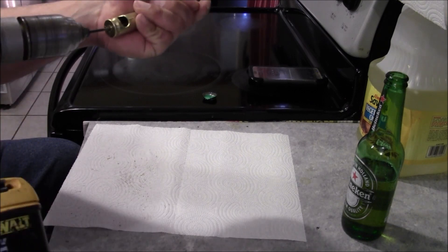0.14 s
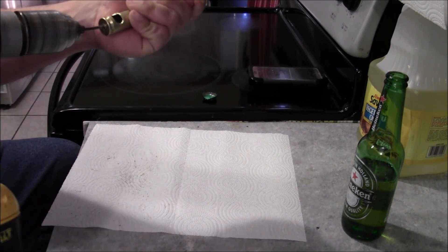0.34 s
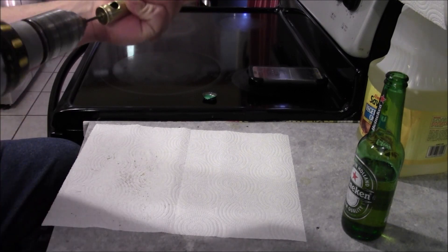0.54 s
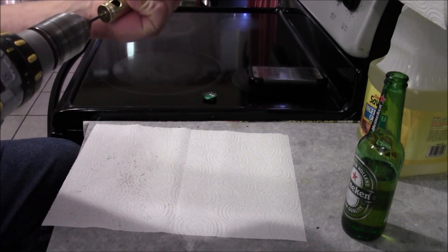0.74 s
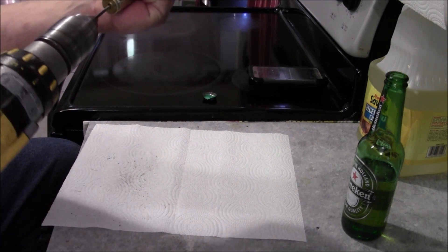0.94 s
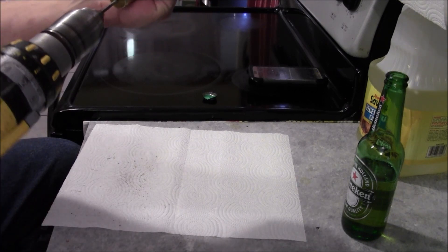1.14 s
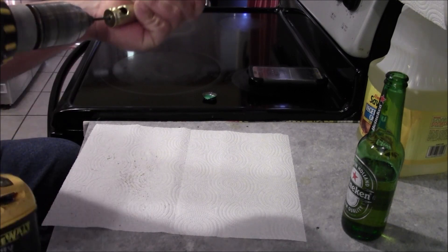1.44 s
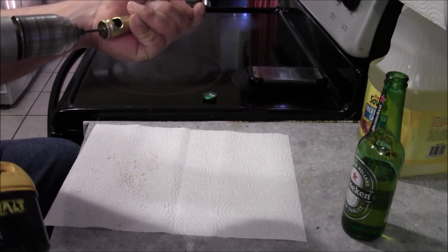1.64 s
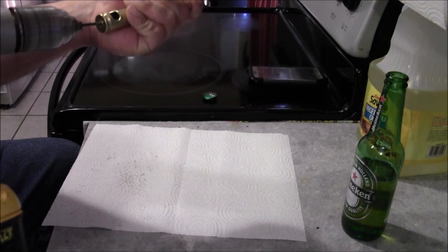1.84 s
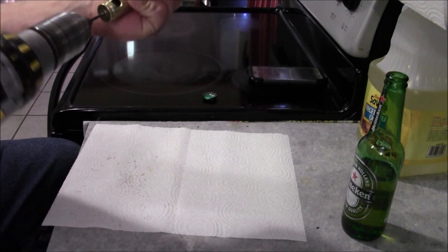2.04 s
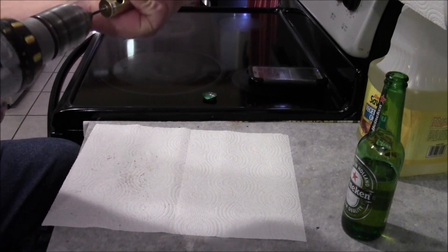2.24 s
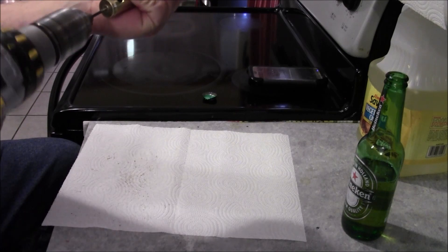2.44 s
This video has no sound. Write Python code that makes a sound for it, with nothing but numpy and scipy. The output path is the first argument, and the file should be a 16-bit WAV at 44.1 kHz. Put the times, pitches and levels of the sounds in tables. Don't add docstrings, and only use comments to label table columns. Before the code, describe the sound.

A cordless drill bores hard metal close by, already running with a buzzing gear whine and gritty rattle. Its pitch sags to about 0.44 s, where the bit squeals briefly, then rises with hissing fan air and holds high until 1.5 s. It bogs down again, squealing roughly around 1.87-1.98 s, then revs to its highest, looser whine by the end. Short tiled-kitchen reverberation, faint low hum.

```python
import sys
import numpy as np
from scipy import signal
from scipy.fft import rfft, irfft
from scipy.io import wavfile
from scipy.ndimage import uniform_filter1d

SR = 44100
rng = np.random.default_rng(int(sys.argv[2]) if len(sys.argv) > 2 else 0)


def store_pcm(level_fs):
    pcm = np.round(np.clip(level_fs, -1, 1) * 32767).astype(np.int16)
    wavfile.write(sys.argv[1], SR, np.atleast_2d(pcm).T)


def attenuation_scalar(level_db):
    decades = np.asarray(level_db, float) / 20
    return 10 ** decades


N = 114660

# time in seconds, shaft speed in Hz.
SHAFT_SPEED = [(0, 158.4), (.112, 157.8), (.28, 132.3), (.393, 107.3), (.438, 103.8), (.56, 197.4),
               (.643, 227.4), (.858, 245.2), (1.078, 257.2), (1.445, 262.9), (1.52, 258.4), (1.77, 184.7),
               (1.915, 155.6), (2.021, 205), (2.119, 237.5), (2.18, 281.4), (2.25, 296.1), (2.6, 309.3)]
# time in seconds, rattle level in dB, fan level in dB.
EFFORT_LEVELS = [(0, -19, -23), (.12, -16, -37), (.43, -16, -43), (.55, -16, -19.5), (.7, -16, -21),
                 (1.1, -16, -21.5), (1.5, -17.5, -17.5), (1.62, -17.5, -29.5), (1.92, -18, -28),
                 (2.05, -15.5, -19.5), (2.3, -17, -21), (2.6, -18.5, -20.5)]
# time in seconds, pole, gear and second stage levels in dB, gear slack (0 = tight).
DRIVE_LOAD = [(0, -7, -13, -4, .1), (.15, -3, -3, -8, 0), (.25, -11, 1, -10, 0), (.41, -13, -7, -14, 0),
              (.46, 4, -12, -8, 0), (.56, 2, -10, -4, 0), (.65, -3, 1, -2, 0), (.84, -15, 1, -7, 0),
              (.96, -2, 1, -6, 0), (1.1, 0, 3, -5, .2), (1.33, -4, -5, -4, .1), (1.45, -12, -18, -3, 0),
              (1.62, -15, -6, 3, 0), (1.78, 1, -13, 3, 0), (1.9, -5, -18, -6, 0), (2, 4, -9, -3, 0),
              (2.15, -5, 0, -6, .5), (2.6, -2, -9, 4, 1.2)]
# multiple of shaft speed, level in dB, wobble in dB, phase wander in rad.
POLE_TONES = [(5, -24, .8, .3)]
# multiple, level in dB, wobble in dB, wander in rad.
GEAR_TONES = [(11.25, -19, 1.5, .5), (12.25, -34, 3, 1), (22.5, -32, 2, 1.2)]
# multiple, level in dB, wobble in dB, wander in rad.
SECOND_STAGE_TONES = [(3.125, -30, 1, .3)]
# multiple, level in dB, wobble in dB, wander in rad.
CAGE_TONES = [(3, -28, 1, .3)]
# multiple, level in dB, wobble in dB, wander in rad.
OVERTONE_TONES = [(15, -28, 2, .7), (23.5, -33, 3, 1.5), (25, -37, 3, 1), (27, -38, 3, 1.2),
                  (30, -35, 3, .8), (33.75, -34, 2, 2), (45, -39, 3, 1.5)]
# centre in Hz, width in Hz, level in dB.
HOUSING_RESONANCES = [(920, 200, 6), (1295, 100, 1), (2800, 600, 0), (3750, 700, 0), (5200, 600, 2),
                      (8000, 900, 4)]
# centre in Hz, width in Hz, level in dB.
RINGING_PARTS = [(893, 110, -13), (1011.5, 65, -13.5), (1450, 110, -33.5), (1602, 80, -26),
                 (2385, 94, -26.5), (2815, 590, -21.5), (3640, 160, -20), (3947, 68, -17), (4196, 46, -20),
                 (4580, 130, -17.5), (4980, 220, -19), (5230, 270, -18.5), (7820, 110, -24),
                 (8660, 120, -27)]
# frequency in Hz, density in dB per Hz.
RATTLE_SPECTRUM = [(150, -55), (250, -16.5), (586, -21), (988, -6.5), (1310, -5), (1550, -4), (2130, -0.5),
                   (3980, 0.5), (16000, -17.5)]
# frequency in Hz, density in dB per Hz.
FAN_SPECTRUM = [(3000, -34.5), (5500, 2.5), (7000, 2), (9000, -0.5), (11000, -4), (13000, -18.5),
                (16000, -33)]
# time in seconds, pitch in Hz, level in dB.
SQUEAL_PATHS = [
    [(.44, 3100, -28), (.451, 3720, -10), (.457, 4500, -19), (.467, 4445, -11), (.479, 4700, -26),
     (.49, 4600, -17), (.497, 3100, -14), (.501, 3720, -10), (.511, 3800, -24)],
    [(1.866, 3880, -24), (1.873, 4044, -13), (1.881, 4450, -17), (1.888, 4200, -15), (1.898, 4500, -21)],
    [(1.902, 4300, -22), (1.908, 4100, -13), (1.915, 4350, -14), (1.925, 3740, -14), (1.935, 3800, -11),
     (1.942, 4400, -13), (1.958, 4030, -13), (1.968, 4420, -14), (1.98, 4300, -28)],
]
# frequency in Hz, density in dB per Hz.
HUM_SPECTRUM = [(22, -22), (40, -31), (52, -1), (65, -8.5), (80, -12.5), (150, -3), (300, -11), (480, 11)]
# frequency in Hz, side level in dB.
SIDE_SPECTRUM = [(60, -12), (300, -18), (1700, -26), (4500, -14.5), (8000, -10), (10000, -15.5),
                 (12000, -7), (15000, -2.5)]


def white():
    return rng.standard_normal(N)


def unit(x):
    return x / np.sqrt(np.mean(x ** 2))


def walk(rate):
    hold = int(SR / rate)
    levels = np.repeat(rng.standard_normal(N // hold + 1), hold)
    return unit(uniform_filter1d(uniform_filter1d(levels, hold), hold)[:N])


def curve(table, t):
    rows = np.array(table, float).T
    return [np.interp(t, rows[0], column) for column in rows[1:]]


def slope(table, hz):
    rows = np.array(table, float).T
    return attenuation_scalar(np.interp(np.log(hz + 1), np.log(rows[0]), rows[1]))


def peaks(table, hz):
    return np.sqrt(sum(attenuation_scalar(2 * db) / (1 + (2 * (hz - f) / w) ** 2) for f, w, db in table))


def shaped(x, gain):
    return irfft(rfft(x) * gain(np.arange(N // 2 + 1) * SR / N), N)


def patchy(x, table, flicker_db, rate):
    out = 0
    for octave in 8 + np.arange(19) / 3:
        def band(hz):
            distance = np.clip(3 * (np.log2(hz + 1) - octave), -1, 1)
            return slope(table, hz) * np.cos(np.pi / 2 * distance) ** 2
        out = out + shaped(x, band) * attenuation_scalar(flicker_db * walk(rate))
    return unit(out)


def whine(table, shaft, slack=0):
    flat_db, slack_wander = -8, 2.4
    turns = np.cumsum(shaft) / SR
    coarse = np.arange(N)[::64]
    out = 0
    for multiple, db, wobble_db, wander in table:
        housing = np.hypot(peaks(HOUSING_RESONANCES, multiple * shaft[coarse]), attenuation_scalar(flat_db))
        gain = np.interp(np.arange(N), coarse, housing) * attenuation_scalar(db + wobble_db * walk(14.27))
        drift = wander * (walk(60) + slack_wander * slack * walk(200))
        phase = 2 * np.pi * multiple * turns + drift + 6 * rng.random()
        out = out + np.sqrt(2) * gain * np.sin(phase)
    return out


def drive_tones(shaft, t):
    slack_db = 14
    pole_db, gear_db, second_db, slack = curve(DRIVE_LOAD, t)
    tones = attenuation_scalar(pole_db) * whine(POLE_TONES, shaft)
    tones = tones + attenuation_scalar(gear_db) * whine(GEAR_TONES, shaft, slack)
    tones = tones + attenuation_scalar(second_db) * whine(SECOND_STAGE_TONES, shaft)
    tones = tones + attenuation_scalar(slack_db * (slack - 1)) * whine(CAGE_TONES, shaft)
    return tones + whine(OVERTONE_TONES, shaft, slack)


def unbalance(shaft):
    level_db, db_per_octave, reference_hz = -44.5, 11, 260
    shake_db = level_db + db_per_octave * np.log2(shaft / reference_hz) + walk(8.9)
    return np.sqrt(2) * attenuation_scalar(shake_db) * np.sin(2 * np.pi * np.cumsum(shaft) / SR)


def rattle(shaft):
    turns = np.cumsum(shaft) / SR
    shaft_db = 1.3 * np.sin(2 * np.pi * turns)
    chuck_db = 0.55 * np.sin(2 * np.pi * turns / 6)
    knocks = white() * attenuation_scalar(shaft_db + chuck_db + 1.23 * walk(300))
    out = patchy(knocks, RATTLE_SPECTRUM, 1.7, 11.54)
    for f, w, db in RINGING_PARTS:
        ring = unit(shaped(knocks, lambda hz: peaks([(f, w, 0)], hz) ** 2))
        out = out + attenuation_scalar(db + 2.0 * walk(9.95)) * ring
    return out


def squeal(t):
    rough_db, jitter = 2.5, .012
    out = 0
    for path in SQUEAL_PATHS:
        hz, db = curve(path, t)
        on = uniform_filter1d(1. * ((t > path[0][0]) & (t < path[-1][0])), size=64)
        phase = 2 * np.pi * np.cumsum(hz * (1 + jitter * walk(500))) / SR
        out = out + np.sqrt(2) * on * attenuation_scalar(db + rough_db * walk(600)) * np.sin(phase)
    return out


def fan_hiss():
    return patchy(white(), FAN_SPECTRUM, 2.2, 11)


def room(x, t60):
    t = np.arange(SR // 2) / SR
    tail = rng.standard_normal(len(t)) * np.exp(-np.log(1000) * t / t60) * (t > .003)
    return signal.fftconvolve(x, tail / np.sqrt(np.sum(tail ** 2)))[:N]


def kitchen_floor():
    def gain(hz):
        return slope(HUM_SPECTRUM, hz) / (1 + (hz / 500) ** 4) / (1 + (20 / (hz + 1)) ** 4)
    return attenuation_scalar(-40) * unit(shaped(white(), gain))


def scene():
    room_db, room_t60_s, squeal_db = -9.5, 0.32, 1.7
    side_t60_s, side_lean, lean_db = 0.044, -0.17, 0.1
    t = np.arange(N) / SR
    shaft = uniform_filter1d(curve(SHAFT_SPEED, t)[0], size=900, mode="nearest")
    shaft = shaft * (1 + .0008 * walk(25))
    rattle_db, fan_db = curve(EFFORT_LEVELS, t)
    drill = drive_tones(shaft, t) + unbalance(shaft)
    drill = drill + attenuation_scalar(rattle_db) * rattle(shaft)
    drill = drill + attenuation_scalar(squeal_db) * squeal(t)
    drill = drill + attenuation_scalar(fan_db) * fan_hiss()
    mid = drill + attenuation_scalar(room_db) * room(drill, room_t60_s) + kitchen_floor()
    spread = room(mid, side_t60_s) + side_lean * mid
    side = shaped(spread, lambda hz: slope(SIDE_SPECTRUM, hz))
    return np.array([(mid + side) * attenuation_scalar(lean_db / 2), (mid - side) * attenuation_scalar(-lean_db / 2)])


def top_cut(x):
    return signal.sosfilt(signal.butter(12, 16630, fs=SR, output="sos"), x)


def record(dry):
    ceiling, top_hz = 1.1, 15700
    limited = ceiling * np.tanh(dry / ceiling)
    low_pass = signal.ellip(12, .3, 70, top_hz, fs=SR, output="sos")
    mix = signal.sosfilt(low_pass, limited)
    return top_cut(mix)


dry = scene()
out = record(dry)
store_pcm(out)
```